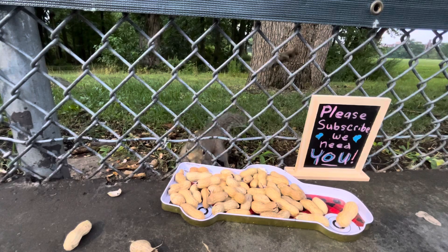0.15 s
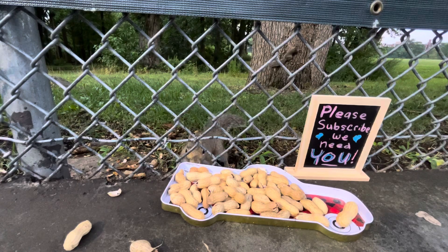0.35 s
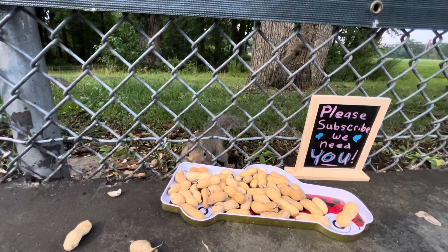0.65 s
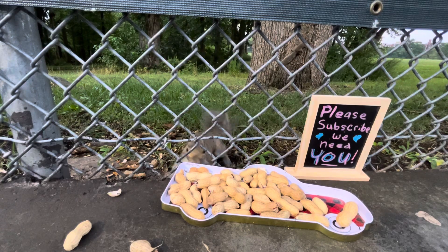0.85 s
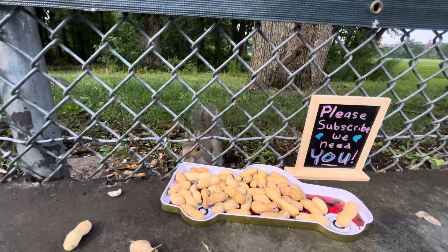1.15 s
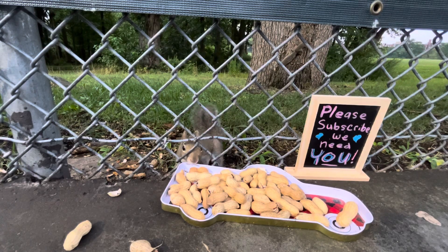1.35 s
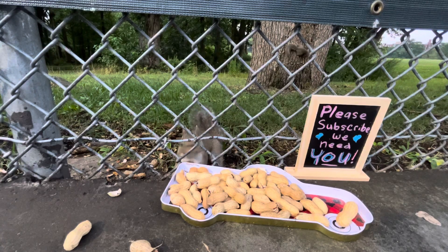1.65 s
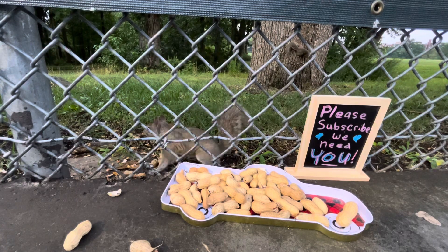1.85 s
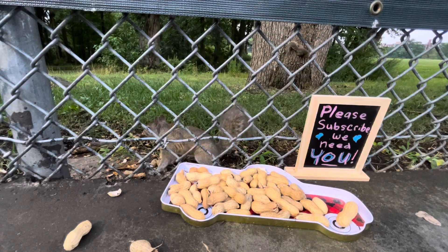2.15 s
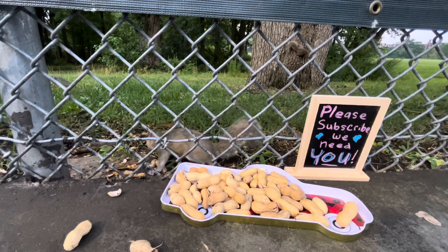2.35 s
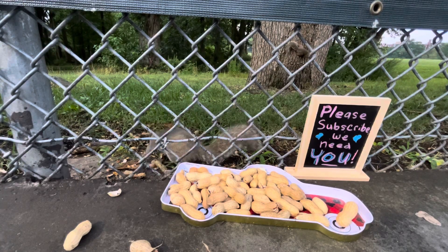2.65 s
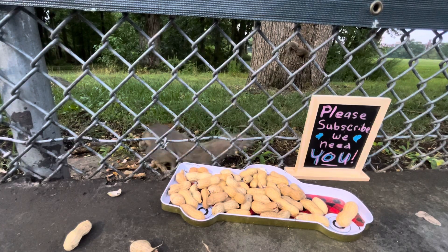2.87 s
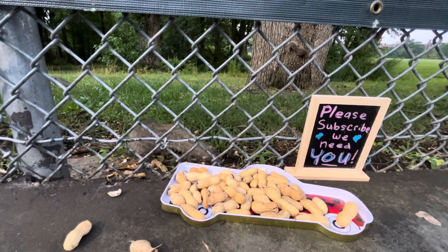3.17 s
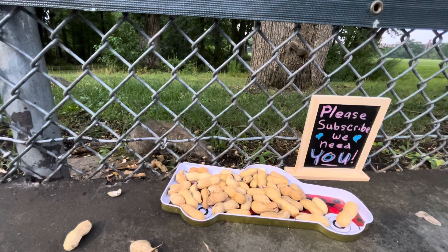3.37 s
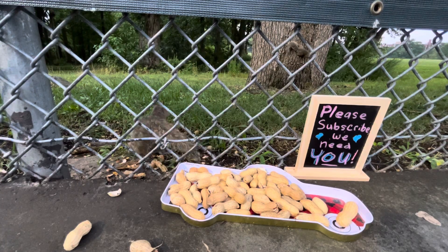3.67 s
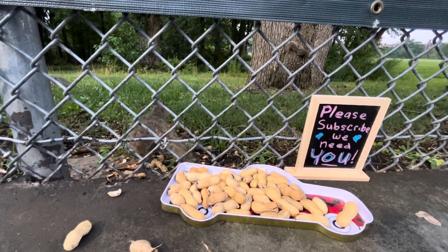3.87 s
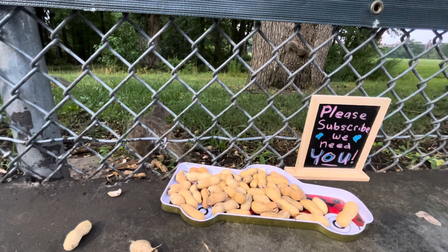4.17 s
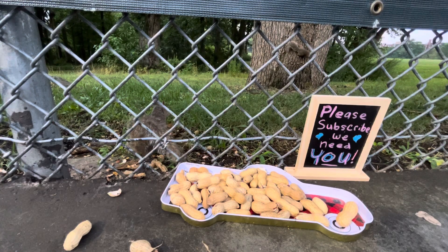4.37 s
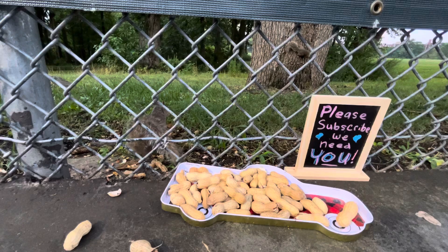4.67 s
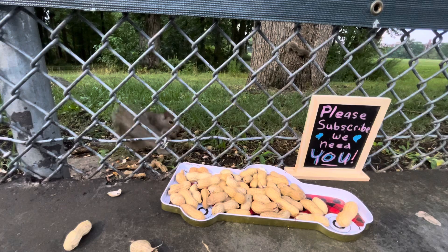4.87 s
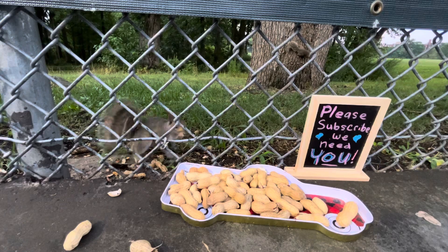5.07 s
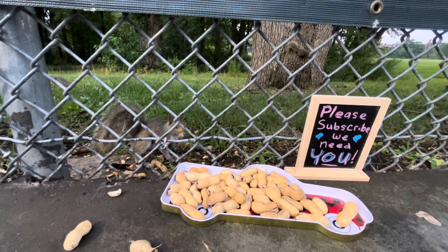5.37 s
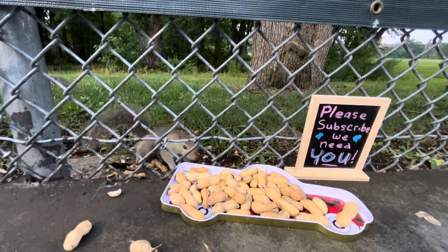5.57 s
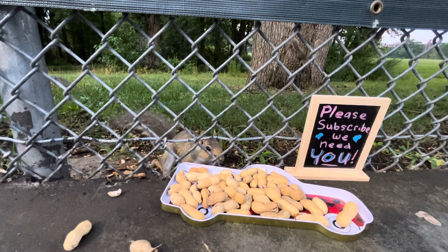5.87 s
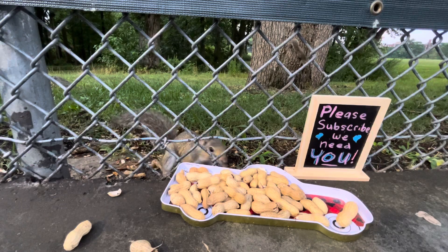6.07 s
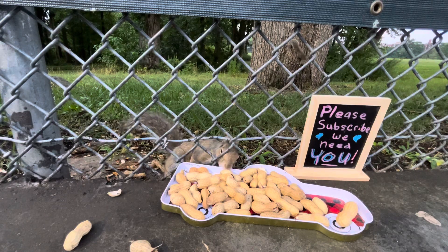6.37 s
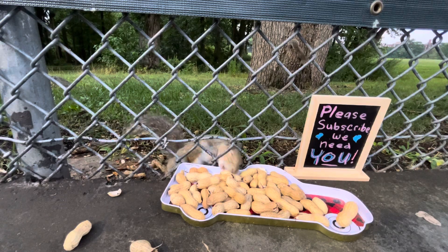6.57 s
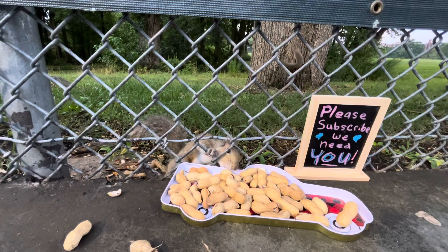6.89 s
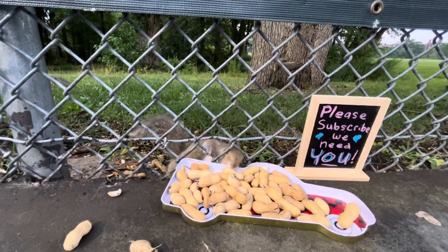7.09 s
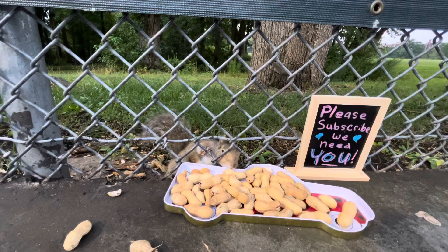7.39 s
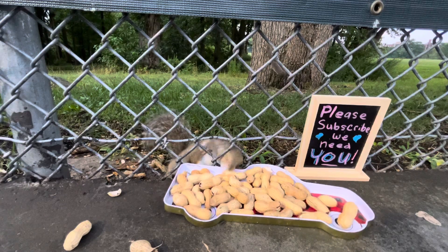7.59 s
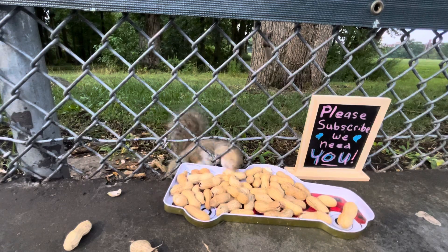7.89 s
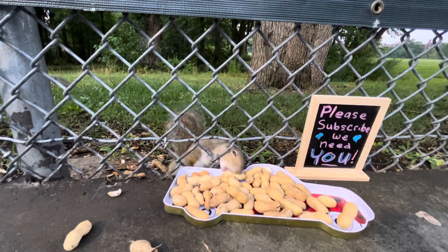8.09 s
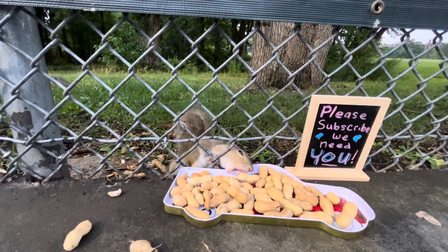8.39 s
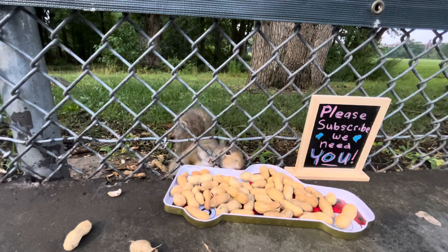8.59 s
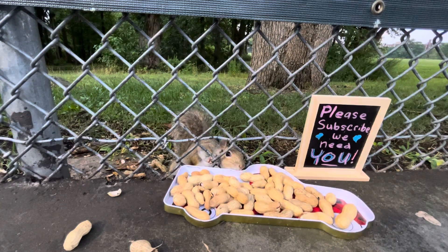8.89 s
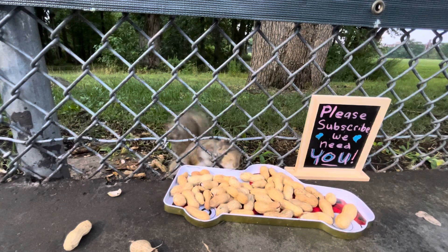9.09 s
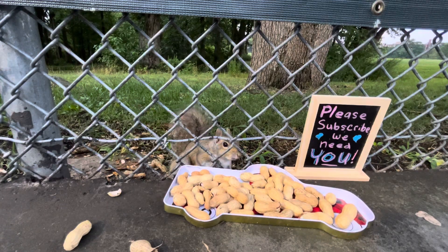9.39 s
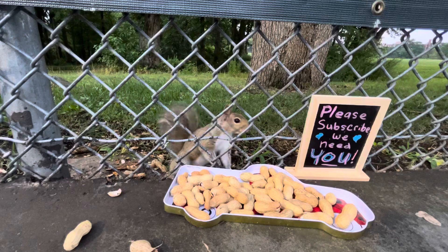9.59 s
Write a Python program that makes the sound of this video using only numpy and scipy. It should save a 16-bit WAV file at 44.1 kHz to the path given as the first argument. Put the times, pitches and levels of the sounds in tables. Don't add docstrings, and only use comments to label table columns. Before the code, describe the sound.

Outdoors, close stereo microphone, about ten seconds. A steady high cricket shimmer and faint leaf hiss lie over low traffic rumble and a wavering engine hum near 65 Hz; a car's soft tyre wash swells around 2 s and fades. Nearby solo ball practice runs throughout: gritty ground bounces at 0.2, 1.9, 3.7, 5.4 and 8.7 s; hollow, echoing board-wall slaps at 0.9, 2.6, 4.3, 6.0, 7.7 and 9.4; racket pops at 1.5, 3.2, 4.9, 6.7 and 8.2. Dry leaves stir in short flurries, with thin claw and tooth ticks, busiest around 4.7 s. From 6.7 s paws dig among peanuts; the loudest, sharp shell cracks ring the tin at 7.07 and 7.25, with scraping until 7.4. Smaller cracks follow at 7.6, then a cluster from 8.0 to 8.5, strongest near 8.34. Afterwards mostly ball, light rustle and crickets remain.

```python
import sys
import numpy as np
from scipy import signal
from scipy.fft import rfft, irfft, next_fast_len
from scipy.io import wavfile
from scipy.ndimage import uniform_filter1d, map_coordinates

SR = 44100
rng = np.random.default_rng(int(sys.argv[2]) if len(sys.argv) > 2 else 0)


def generate_wav(signal):
    frames = np.transpose(np.atleast_2d(signal))
    scaled = np.clip(frames, -1, 1) * 32767
    pcm = np.round(scaled).astype(np.int16)
    wavfile.write(sys.argv[1], SR, pcm)


def gain_from_db(level_db):
    decades = np.asarray(level_db, float) / 20
    return 10 ** decades


N = 429534


def unit(x):
    return x / np.sqrt(np.mean(x ** 2) + 1e-20)


def along(points, hz):
    f, v = np.transpose(points)
    return np.interp(np.log(hz + 1), np.log(f + 1), v)


def curves(rows):
    s, *columns = np.transpose(rows)
    return [np.interp(np.arange(N) / SR, s, column) for column in columns]


def wobble(rate):
    knots = rng.standard_normal(int(N * rate / SR) + 4)
    return map_coordinates(knots, [np.arange(N) * rate / SR])


def filtered(x, response):
    n = x.shape[-1]
    m = next_fast_len(n + 4096)
    return irfft(rfft(x, m) * response(np.fft.rfftfreq(m, 1 / SR)), m)[..., :n]


def resonances(peaks):
    def response(f):
        total = 0
        for k, (centre, width, db) in enumerate(peaks):
            total = total + (-1) ** k * gain_from_db(db) * 1j * f * width / (centre * centre - f * f + 1j * f * width)
        return total
    return response


# pitch_hz, likeness (1 = same, 0 = unrelated)
LIKENESS = [(60, 0.95), (130, 0.95), (290, 0.52), (640, 0.068), (1410, 0.35), (3100, -0.064), (6820, 0.039),
            (15000, -0.067)]


def rush(spectrum, patchy_db):
    z = signal.stft(rng.standard_normal((2, N + 512)), nperseg=512)[2]
    field = uniform_filter1d(rng.standard_normal(z.shape[1:]), size=6, axis=0)
    field = uniform_filter1d(field, size=14, axis=1)
    pair = signal.istft(z * gain_from_db(patchy_db * unit(field)), nperseg=512)[1][:, :N]

    def colour(hz):
        turn = np.arccos(np.clip(along(LIKENESS, hz), -1, 1)) / 2
        return gain_from_db(along(spectrum, hz)) * [np.cos(turn), np.sin(turn)]

    mid, side = filtered(pair, colour)
    return unit(np.array([mid + side, mid - side]))


def add(out, x, s, pan_db, lag):
    for side, sign in enumerate((1, -1)):
        start = round((s + sign * lag / 2) * SR)
        port = np.broadcast_to(x, (2, x.shape[-1]))[side]
        out[side, start:start + x.shape[-1]] += gain_from_db(sign * pan_db / 2) * port


def burst(t60, rise, spectrum, alike, click=0, grain_db=0, tail_db=-90):
    t = np.arange(SR // 4) / SR
    both, *own = rng.standard_normal((3, len(t)))
    noise = np.sqrt(alike) * both + np.sqrt(1 - alike) * np.array(own)
    splinters = gain_from_db(grain_db * np.repeat(rng.standard_normal(len(t) // 25), 25))
    fall_s = max(t60, .002)
    fade = gain_from_db(-60 * t / fall_s) + gain_from_db(tail_db - 15 * t / fall_s)
    push = noise * splinters * fade * (1 - np.exp(-t / rise))
    push = push + click * (np.arange(len(t)) == 16)
    x = filtered(push, spectrum)
    return x / abs(x).max()


def scrape(spectrum, rate, near):
    hits = (rng.random((3, N)) < rate / SR) * rng.standard_normal((3, N))
    spot, left, right = (unit(v) for v in filtered(hits, lambda hz: gain_from_db(along(spectrum, hz))))
    near = np.clip(near, 0, 1)
    one_spot = np.array([spot, np.roll(spot, shift=3)])
    return np.sqrt(near) * one_spot + np.sqrt(1 - near) * np.array([left, right])


def swells(rows, swing_db):
    t = np.arange(0, N, 32) / SR
    gain = 0
    for s, db, rise, fall in rows:
        reach = np.where(t < s, (s - t) / max(rise, .005), (t - s) / max(fall, .005))
        reach = np.minimum(reach, 3)
        gain = gain + gain_from_db(db - swing_db * np.maximum(reach, reach ** 4))
    return np.interp(np.arange(N) / SR, t, gain)


# time_s, level_db
CHORUS = [
    (0.0, -61),
    (2.09, -62),
    (6.97, -62),
    (7.13, -61.5),
    (9.74, -62.5),
]
# pitch_hz, width_hz, level_db
WINGS = [(5367, 800, -2.5), (5920, 1830, -12.5), (11300, 350, -21)]
# pitch_hz, level_db (per Hz)
FAR_LEAVES = [(2000, -1), (4000, -7), (6500, -4), (7200, -16.5), (11000, -17), (12000, -24), (14400, -24.5),
              (14900, -48)]


def crickets():
    f = np.geomspace(3500, 13000, num=200)
    band = np.transpose([f, 40 * np.log10(abs(resonances(WINGS)(f)) + 0.00089)])
    singers = gain_from_db(curves(CHORUS)[0]) * rush(band, patchy_db=1.0)
    return singers + gain_from_db(-62.0) * rush(FAR_LEAVES, patchy_db=4.0)


# time_s, pitch_hz, level_db
ENGINE = [(0.0, 60.86, -42.5), (1.36, 63, -36.5), (1.65, 67.45, -38), (1.87, 63.2, -39), (2.33, 62.13, -37),
          (2.41, 70.8, -64), (2.85, 61.3, -37.5), (3.2, 67.8, -36.5), (3.58, 65.37, -37.5),
          (5.7, 65.74, -38.5), (5.89, 60.7, -38.5), (6.21, 72, -59), (6.35, 66.2, -36), (7.32, 65.1, -42),
          (7.81, 70.7, -45), (8.38, 64.84, -38), (9.63, 68.8, -33), (9.74, 67.7, -65)]


def engine():
    hum_hz, hum_db = curves(ENGINE)
    level = np.sqrt(2) * gain_from_db(hum_db - 3.0 + 0.57 * wobble(8.4))
    return level * np.sin(2 * np.pi * np.cumsum(hum_hz) / SR + .5 * wobble(7.2))


# pitch_hz, level_db (per Hz)
RUMBLE = [(12, -81), (20, -58.5), (46, -13.5), (70, -11.5), (118, -13), (141, -16), (172, -19), (267, -27),
          (535, -38.5), (600, -51), (780, -61.5), (1320, -120)]
# pitch_hz, level_db (per Hz)
TYRES = [(240, -3.5), (400, -10.5), (650, -7), (950, -2.5), (1300, -10.5), (1760, -17), (2300, -24),
         (4000, -31.5), (7000, -57.5)]


def traffic():
    nearest_s, nearest_db, span_s = 1.95, -44.5, 1.82
    away = (np.arange(N) / SR - nearest_s) / span_s
    car_db = nearest_db - 10 * np.log10(1 + away ** 2)
    rumble = gain_from_db(-38.68 + 1.1 * wobble(3.02)) * rush(RUMBLE, patchy_db=1.0)
    return rumble + gain_from_db(car_db + 2.0 + 0.15 * wobble(4)) * rush(TYRES, patchy_db=1.5)


# pitch_hz, left_over_right_db
FAR_SIDE = [(400, 0.5), (1300, 3), (4400, 7), (8000, 1.5), (15000, -10)]


def distance():
    far = crickets() + engine() + traffic()
    return filtered(far, lambda hz: gain_from_db(np.outer([.5, -.5], along(FAR_SIDE, hz))))


# time_s, level_db, half_length_s
FLURRIES = [(0.028, -67, 0.33), (.47, -72, 0.12), (0.938, -59, .12), (1.854, -72, .1), (2.35, -95, .1),
            (2.954, -72, 0.18), (4.007, -73, .1), (4.328, -73, .1), (4.757, -60, 0.11), (4.93, -70, .09),
            (5.03, -69, .1), (5.627, -81, 0.23), (6.098, -66, .1), (6.649, -66, .2), (7.2, -72, .08),
            (7.353, -77, .12), (7.76, -55, .15), (8.004, -70, 0.17), (8.189, -58, 0.098), (8.285, -56, .07),
            (8.353, -75, .1), (8.697, -88, 0.22), (9.141, -84, 0.19), (9.436, -64, 0.19)]
# pitch_hz, level_db (per Hz)
FINE = [(8000, -48), (9300, -23), (9800, -12), (10200, -12), (12000, -12), (14200, -12), (14900, -20.5),
        (16300, -55.5)]


def leaves():
    still_db, swing_db = -94.5, 17
    flutter = gain_from_db(1.5 * wobble(19.0) + 4.0 * wobble(40))
    stir = gain_from_db(still_db) + swells([(s, db, half, half) for s, db, half in FLURRIES], swing_db)
    rustle = scrape([(6500, -50), (8500, -14), *FINE[2:]], 4000, 0.54)
    return gain_from_db(-5.5) * stir * flutter * rustle


# start_s, peak_db, pitch_hz,
# left_over_right_db
NIBBLES = [(0.1356, -41, 13500, -5), (0.4404, -44.5, 9260, -15), (0.5324, -51, 8260, 8),
           (1.807, -48, 13200, -0.5), (1.8647, -54, 8970, -1), (2.339, -60, 13300, -6),
           (2.5087, -54, 9750, 14), (3.9732, -50.5, 10800, -6), (4.0113, -37, 9070, 3),
           (4.3025, -52, 7510, -2), (4.6124, -53, 9150, 12), (4.689, -40, 9200, 0), (4.7315, -38, 11560, 4),
           (4.77, -30.5, 9500, -11), (4.9184, -54, 7910, 10), (4.9709, -46, 7680, 12),
           (5.0053, -54, 13420, 0.0), (5.0429, -53, 12640, -2), (5.5386, -48, 8610, -8),
           (5.7237, -51, 11700, 0), (6.333, -48, 12700, -4), (6.7117, -46, 7970, 8.5),
           (6.774, -39, 10800, -11), (7.147, -41, 13000, -2), (7.167, -46, 13500, 0),
           (7.187, -40, 13500, -2), (7.22, -49, 13500, 0), (7.8141, -47, 11450, -5),
           (8.6443, -61, 8750, -16), (8.6891, -59, 9160, -8.0),
           (1.2594, -63, 10400, 3), (1.4621, -65, 13830, -1.0), (1.9026, -46, 10300, -3.5),
          (2.117, -67, 13300, -2.0), (2.3794, -71, 14000, -1.0), (2.8599, -69, 10600, 1),
          (2.9642, -60, 13500, -3), (3.038, -54, 13400, -1.0), (3.3737, -59, 13600, -2.0),
          (3.7978, -63, 11400, -4.0), (4.725, -43, 10500, -2.5), (4.7624, -52, 12470, -1),
          (5.8167, -58.5, 13300, 1.0), (6.5294, -49, 13000, -3), (6.5874, -47.5, 11000, -1.5)]


def nibbles():
    out = np.zeros((2, N + SR))
    for s, db, centre_hz, pan_db in NIBBLES:
        colour = lambda hz: resonances([(centre_hz, 5000, 0)])(hz) ** 2 * (hz < 16200)
        add(out, gain_from_db(db - 0.5) * burst(0.0126, 0.00026, colour, 0.39), s, .5 * pan_db, -.0001)
    return out[:, :N]


# pitch_hz, fall_by_60_db_s
COURT = [(200, 0.26), (900, 0.74), (3000, 0.6), (7000, 0.82)]


def court(x, wet_db):
    hz, t, z = signal.stft(rng.standard_normal((2, SR // 2)), SR, nperseg=256)
    tail = signal.istft(z * gain_from_db(-60 * t / along(COURT, hz)[:, None]), SR, nperseg=256)[1]
    return gain_from_db(wet_db) * signal.fftconvolve(x[None], tail / np.linalg.norm(tail[0]), axes=1)


def ringing(t, t60, rise):
    return gain_from_db(-60 * t / t60) * (1 - np.exp(-t / rise)) ** 3


GROUND = (2, 5)


def ball(contacts, modes, paths, ring_db, tick_db, thump_db, thump_hz, wet_db, height, tints, squash, felt,
         slap_s=.0035):
    out, t = np.zeros((2, N + SR)), np.arange(SR // 4) / SR
    for contact, later_s, (first_mode_db, direct_db, shift_hz) in zip(contacts, height, squash):
        s, slap_peak_db, ring_peak_db, thump_peak_db = contact
        ring = 0
        for k, (hz, db, t60, rise) in enumerate(modes):
            tone = ringing(t, t60, rise) * np.sin(2 * np.pi * (hz + shift_hz) * t)
            ring = ring + (-1) ** k * gain_from_db(db + first_mode_db * (k == 0)) * tone
        ring = gain_from_db(ring_peak_db + ring_db) * ring
        thump = ringing(t, 0.016, 0.0024) * np.sin(2 * np.pi * thump_hz * t)
        thump = gain_from_db(thump_peak_db + thump_db) * thump

        def slap(k):
            tint = resonances([(tints[min(k, len(tints) - 1)], 2500, 0)])

            def colour(hz):
                ripple = 1 + 0.15 * np.cos(2 * np.pi * hz * 0.000551)
                return gain_from_db(along(felt, hz)) * ripple * (0.23 + abs(tint(hz)) ** 2)
            return gain_from_db(slap_peak_db + tick_db) * burst(slap_s, .000175, colour, 0.79, click=3.55)

        for k, (delay, body_db, slap_db, pan_db, lag) in enumerate(paths):
            arrival = s + delay + later_s * (k in GROUND)
            add(out, gain_from_db(body_db + direct_db * (k == 0)) * ring, arrival, pan_db, lag)
            add(out, gain_from_db(body_db - 4.5 * (k > GROUND[0])) * thump, arrival, -.2 * pan_db, lag)
            add(out, gain_from_db(slap_db) * slap(k), arrival + .0004, -1.3 * pan_db, lag)
        dull_slap = filtered(0.9 * slap(0)[0], lambda hz: 1 / (1 + (hz / 4500) ** 2))
        wet = court(ring + thump + dull_slap, wet_db)
        start = round((s + .006) * SR)
        out[:, start:start + wet.shape[1]] += wet[:, :out.shape[1] - start]
    return out[:, :N]


# start_s, slap_peak_db, ring_peak_db, thump_peak_db
BOUNCES = [
    (0.2316, -30.5, -27.5, -24.5),
    (1.8851, -40, -37, -40),
    (3.6712, -38, -34.5, -52),
    (5.3658, -36, -31, -29),
    (8.737, -34.5, -31.5, -34),
]
# pitch_hz, level_db, fall_by_60_db_s, rise_s
BOUNCE_RING = [(890, 31, 0.027, 0.009), (1082, 7, 0.016, 0.0006), (1420, -3, .012, .0005),
               (666, -8, 0.06, 0.0024)]
# delay_s, ring_db, slap_db, left_over_right_db, left_lag_s
BOUNCE_PATHS = [(0, 7, 6.5, 2.5, -.00007), (.009, -38, -24, 1.5, -.0001), (0.043, -10.5, -42, .6, .0001)]
# first_mode_db, direct_ring_db, pitch_shift_hz
BOUNCE_SQUASH = [(1, 0.1, -44), (4.5, 0.1, 21), (-2, 0.1, -5), (-5, 0.1, -30), (0.5, 0.1, 25)]
# pitch_hz, level_db
SCUFF = [(1500, -12), (2600, -1), (3600, -7), (4400, -4), (4800, 3), (5400, -7), (6000, 3.5), (7000, -8),
         (14000, -22)]


def bounces():
    return ball(BOUNCES, BOUNCE_RING, BOUNCE_PATHS, ring_db=-5.5, tick_db=-1.5, thump_db=9.5, thump_hz=247,
                wet_db=-5, height=np.zeros(len(BOUNCES)), tints=[5000], squash=BOUNCE_SQUASH,
                felt=SCUFF, slap_s=0.03955)


# start_s, slap_peak_db, ring_peak_db, thump_peak_db
WALL_HITS = [
    (0.8872, -31.5, -21.5, -36.5),
    (2.598, -34.5, -27.5, -40),
    (4.3216, -33, -23.5, -37.5),
    (6.0313, -33, -25, -37.5),
    (7.7114, -32.5, -21.5, -36.5),
    (9.406, -30.5, -23, -37.5),
]
# pitch_hz, level_db, fall_by_60_db_s, rise_s
WALL_RING = [(815.4, 25, 0.022, 0.0081), (866, 20.5, 0.029, 0.015), (988, -4, 0.017, 0.00034),
             (1350, -19, 0.019, 0.00047), (1718, -22, 0.028, 0.0005), (611, -21.5, 0.049, 0.0016)]
# delay_s, ring_db, slap_db, left_over_right_db, left_lag_s
WALL_PATHS = [(0, 8.5, 4, -4.5, 0.00043), (.0055, -6.5, -29, -11, 0.00012), (0.012, 10, 8, -3, 0.00019),
              (0.0375, 5.5, 3.5, -2.5, 0.00012), (0.043, -5, -24, -6, 0.000037),
              (.051, 1, -5, -3.5, 0.000074), (.078, -4.5, -92, -1, 0.000056), (.094, -10.5, -90, -7, .0002),
              (.12, -14, -91, -4, .0002), (.16, -13.5, -90, -4, .0001), (.2, -12.5, -90, -4, 0.00016)]
WALL_HEIGHT = [0, .005, .002, 0, -.001, 0]
WALL_TINT = [5650, 5500, 5540, 6300, 6020, 7460]
# first_mode_db, direct_ring_db, pitch_shift_hz
WALL_SQUASH = [(0.1, -1.5, 5.1), (0.1, -5, 3), (0.1, -0.5, 3), (0.1, -3.5, 3), (0.1, 2.5, 3),
               (0.1, -1.5, 3.8)]
# pitch_hz, level_db
FELT_SLAP = [(300, -16), (1200, 0), (2000, 9.5), (2800, 8), (5500, -4), (8000, -5), (11000, -12.5),
             (16000, -18.5)]


def wall_hits():
    return ball(WALL_HITS, WALL_RING, WALL_PATHS, ring_db=1.5, tick_db=9.0, thump_db=26.5, thump_hz=239.0,
                wet_db=6.5, height=WALL_HEIGHT, tints=WALL_TINT, squash=WALL_SQUASH, felt=FELT_SLAP)


# start_s, slap_peak_db, ring_peak_db, thump_peak_db
STROKES = [
    (1.5031, -31.5, -29, -35),
    (3.2202, -30, -27.5, -27.5),
    (4.8755, -33.5, -29.5, -30.5),
    (6.7224, -31, -29, -28),
    (8.1598, -35.5, -32, -29),
]
# pitch_hz, level_db, fall_by_60_db_s, rise_s
STROKE_RING = [(921, 1.5, .04, .0004), (1090, -9, .03, .0004), (620, -9, .04, .001),
               (1360, -16, .015, .0003), (1670, -15, .012, .0003)]
# delay_s, ring_db, slap_db, left_over_right_db, left_lag_s
STROKE_PATHS = [(0, 7.5, 7, -3, .00007), (.0055, -3, -23, 9, .00007), (0.015, -2.5, -29, -5, .0001),
                (0.027, -13, -28, -1, .0001), (0.049, -9.5, -14, -11, -.0001),
                (0.062, -14, -21, -14, .0001), (.087, -10, -14, -2, .0001), (.128, -14.5, -21, -4, .0001),
                (0.168, -15.5, -90, 1.5, -.0001)]
STROKE_TINT = [6700, 7000, 2600, 2600, 2600, 2630, 2400, 2397]
# pitch_hz, level_db
STRINGS = [(300, -21.5), (1300, 15.5), (2200, 2), (3800, -1), (6000, -7), (8500, -8), (11000, -19),
           (16000, -36)]


def strokes():
    squash = [(0.1, 0.1, 3)] * len(STROKES)  # first_mode_db, direct_ring_db, pitch_shift_hz
    return ball(STROKES, STROKE_RING, STROKE_PATHS, ring_db=1.5, tick_db=9.5, thump_db=14.5, thump_hz=200,
                wet_db=3.0, height=np.zeros(len(STROKES)), tints=STROKE_TINT, squash=squash, felt=STRINGS)


# strongest_s, level_db, build_up_s, let_go_s
DIGS = [(6.69, -63, 0.26, 0.019), (7.02, -57.5, 0.2, 0.067), (7.15, -45, 0.089, 0.042),
        (7.25, -42, 0.059, 0.068), (7.32, -34.5, 0.022, 0.034), (7.35, -39, 0.034, 0.029),
        (7.395, -45.5, 0.042, 0.054), (7.616, -53.5, 0.17, 0.14), (8.05, -51, 0.18, 0.2),
        (8.225, -53, 0.052, 0.062), (8.27, -48.5, 0.048, 0.06), (8.325, -40.5, 0.068, 0.018),
        (8.35, -45, .012, 0.034), (8.46, -50.5, 0.24, 0.084)]
# pitch_hz, level_db (per Hz)
SHELL = [(150, -40.5), (300, -4.5), (1000, -3), (1900, -7), (3000, -9), (5400, -11), (7500, -16),
         (8100, -33), (9600, -45), (10500, -80)]
# pitch_hz, width_hz, level_db
TRAY = [(1596, 70, -20.5), (1986, 240, 0.5), (2712, 62, -3.5), (3671, 52, -1.5), (4280, 52, 1),
        (4870, 81, 4), (5600, 230, -13), (6220, 220, 0.5)]


def rummage():
    force = swells(DIGS, swing_db=18) * gain_from_db(1.2 * wobble(110))
    tray = filtered(scrape(SHELL, 3000, 0.4), lambda hz: resonances(TRAY)(hz) + .5)
    return force * (gain_from_db(-0.5) * unit(tray) + gain_from_db(-15) * scrape(FINE, 6100, 0.54))


# start_s, peak_db, low_part_db, high_part_db (both relative), hollow_hz
CRACKS = [(6.977, -41, -11, -1, 4520), (7.0318, -44, -13, 6, 5060), (7.0682, -30, 3, -30, 970),
          (7.0757, -17, 3, -6, 1930), (7.082, -30.5, -2, -20, 4040), (7.093, -33, 10, -2, 2930),
          (7.105, -27, 13, -4, 1980), (7.142, -50, 0, 11, 3000), (7.219, -48, -22, -5, 2430),
          (7.2436, -14, -5.5, 2.5, 4430), (7.246, -18.5, 6, -30, 1610), (7.2533, -22, -10, -36, 4460),
          (7.256, -26, 6, -20, 1580), (7.2752, -27, 5.5, -40, 1630), (7.284, -34, 8, -30, 1630),
          (7.3117, -39, -6, -5, 6300), (7.3162, -28, -17, -25, 4670), (7.3404, -24.5, 6, -31, 1860),
          (7.349, -31, 9, -31, 2300), (7.355, -38, 0, -20, 3120), (7.3901, -32.5, 10.5, -30, 1900),
          (7.584, -31, 1.5, -7, 2200), (7.6064, -35.5, -3, 2, 4540), (7.9835, -43, -8, 3.5, 4510),
          (8.0181, -31, 10.5, -12, 1958), (8.054, -40, 11, -11, 2030), (8.093, -43, 6, -9, 2800),
          (8.2004, -43, 9, -20, 2350), (8.2183, -30.5, 8.5, -37, 3290), (8.257, -36, 6, -1, 2100),
          (8.286, -36.5, 5, 1, 2220), (8.308, -34, 0, -7, 2967), (8.3199, -31, -5, -20, 5050),
          (8.3376, -21.5, -2.5, -7, 2440), (8.4044, -47, 8, -15, 2130), (8.4347, -37, 7, -4, 1900),
          (8.47, -33.5, 9.5, -34, 3220)]


def cracks():
    crack_t60_s, snap_t60_s, snap_db = 0.046, 0.02, -2
    detune, spread_db = .02, 2.5
    out = np.zeros((2, N + SR))
    for s, db, low_db, high_db, hollow_hz in CRACKS:
        modes = []
        for c, w, g in TRAY:
            mode_hz = c * (1 + detune * rng.standard_normal())
            modes.append((mode_hz, w, g + spread_db * rng.standard_normal()))
        tray = resonances(modes + [(hollow_hz, 130, 2.5)])
        slope = [(120, low_db - 10), (270, low_db), (450, low_db - 7.0), (1800, low_db - 5.5), (4500, -8.5),
                 (7400, -10.0), (8000, -14), (8600, -29), (9600, -28), (10500, -44)]
        tilt = lambda hz: gain_from_db(along(slope, hz))
        ring_colour = lambda hz: tilt(hz) * (tray(hz) + 0.4)
        snap_colour = lambda hz: (tilt(hz) + 0.08) * (hz > 900) * (hz < 15800)
        body = burst(crack_t60_s, 0.00038, ring_colour, 0.46, grain_db=5.0, tail_db=-15)
        top = burst(0.51 * crack_t60_s, 0.00015, lambda hz: gain_from_db(along(FINE, hz)), 0.86, tail_db=-18)
        snap = burst(snap_t60_s, 0.00016, snap_colour, 0.73, click=3.83)
        add(out, gain_from_db(db + 6.5) * body, s, 0, -.000045)
        add(out, gain_from_db(db + snap_db) * snap + gain_from_db(db + high_db - 3.5) * top, s, -2.5, 0)
    return out[:, :N]


def scene():
    practice = bounces() + wall_hits() + strokes()
    return distance() + leaves() + nibbles() + practice + rummage() + cracks()


def thin_treble(x, floor_db, mask_db):
    hz, t, z = signal.stft(x, SR, nperseg=2048)
    band = np.arange(64)[:, None]
    power = (abs(z[:, :1024]) ** 2).sum(axis=0).reshape(64, 16, -1).mean(axis=1)
    level_db = 10 * np.log10(power + 1e-20)
    middle_db = level_db[6:18].mean(axis=0)
    need_db = np.maximum(floor_db, middle_db - mask_db - 8 * (band > 28))
    whim_db = 2.5 * unit(uniform_filter1d(rng.standard_normal(level_db.shape), size=3))
    keep = (level_db > need_db + whim_db) | (band < 20)
    gate = np.pad(np.repeat(keep, 16, axis=0), [(0, 1), (0, 0)])
    return signal.istft(z * gate, SR, nperseg=2048)[1][:, :N]


def band_limit(x):
    return signal.sosfilt(signal.butter(12, 16500, fs=SR, output="sos"), x)


def record(dry):
    edged = filtered(dry, lambda hz: gain_from_db(along([(15600, 0), (16500, -18)], hz)))
    thinned = thin_treble(edged, floor_db=-103.5, mask_db=19.5)
    return band_limit(thinned)


dry = scene()
out = record(dry)
generate_wav(out)
```